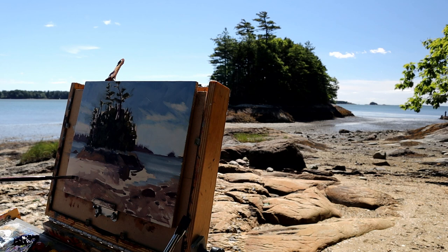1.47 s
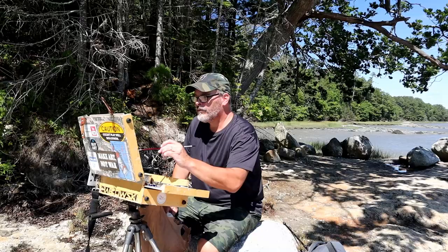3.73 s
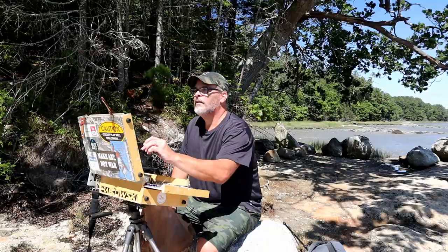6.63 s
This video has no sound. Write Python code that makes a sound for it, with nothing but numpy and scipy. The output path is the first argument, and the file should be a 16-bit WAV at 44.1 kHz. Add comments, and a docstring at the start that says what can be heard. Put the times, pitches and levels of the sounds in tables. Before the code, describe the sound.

Leaves hiss all around as uneven gusts thump against the microphone, with a faint distant bird and a few light wooden taps.

```python
"""Gusty breeze on a wooded shore

Tree crowns hiss all around; near leaves patter and flick, and wood taps lightly close by. A far bird
gives two short whistles. Air tumbles right over the microphone in dull buffets and pops, the hardest
ducking the recorder's limiter. Halfway through, the sound cuts abruptly: the tree hiss drops and the
wind stops leaning left."""
import sys
import numpy as np
from scipy import signal
from scipy.fft import rfft, irfft, next_fast_len
from scipy.io import wavfile
from scipy.ndimage import uniform_filter1d, minimum_filter1d, map_coordinates

SR = 44100
rng = np.random.default_rng(int(sys.argv[2]) if len(sys.argv) > 2 else 0)


def persist_wave(psi):
    """Save psi, clipped to +-1, as 16-bit WAV."""
    counts = np.round(np.clip(psi, -1, 1) * 32767).astype(np.int16)
    wavfile.write(sys.argv[1], SR, np.atleast_2d(counts).T)


N = 323253
TIME = np.arange(N) / SR
CUT_S = 3.85  # the sound cuts abruptly


def from_db(db):
    """Decibels to gain."""
    return 10 ** (np.asarray(db) / 20)


def unit_rms(x):
    """Scale to an rms of 1."""
    return x / np.sqrt(np.mean(x ** 2) + 1e-20)


def in_time(rows):
    """Each column of a curve at every sample."""
    times, *columns = np.transpose(rows)
    return [np.interp(TIME, times, column) for column in columns]


def at_hz(points, hz):
    """Read a table on a log-frequency axis."""
    table = np.array(points)
    return np.interp(np.log(hz + 1), np.log(table[:, 0]), table[:, 1])


def colour(x, spectrum):
    """Give a signal a spectrum that falls away beyond its ends; rms 1."""
    hz = np.fft.rfftfreq(x.shape[-1], 1 / SR)
    ends = np.minimum(hz / spectrum[0][0], 1) ** 2 / np.maximum(hz / spectrum[-1][0], 1) ** 4
    return unit_rms(irfft(rfft(x) * from_db(at_hz(spectrum, hz)) * ends, x.shape[-1]))


def drift(per_s):
    """A random wander with about this many changes a second; spread 1."""
    hop, settle = 40, 2000
    pole = np.exp(-2 * np.pi * hop * per_s / SR)
    noise = rng.standard_normal(N // hop + settle + 2)
    slow = signal.lfilter([1], [1, -2 * pole, pole * pole], noise)[settle:]
    return np.interp(np.arange(N) / hop, np.arange(len(slow)), unit_rms(slow))


# The microphone's two ports hear the trees alike in the bass, opposed in the treble:
# (frequency [Hz], correlation [-1 to 1])
PORT_LIKENESS = [(500, 1), (1200, 0.84), (2100, 0.65), (3100, 0.066), (4200, -0.34), (5800, -0.61),
                 (10000, -0.75)]
def all_around(pair):
    """Two unrelated signals become the left and right of a sound that surrounds the microphone."""
    size = next_fast_len(N)
    alike = np.clip(at_hz(PORT_LIKENESS, np.fft.rfftfreq(size, 1 / SR)), -.99, .99)
    mid, side = irfft(rfft(pair, size) * np.sqrt([1 + alike, 1 - alike]), size)
    return np.array([mid + side, mid - side])


def leaf_touches(per_s, spread_db):
    """Countless tiny contacts of uneven size, in two unrelated streams."""
    sizes = from_db(spread_db * np.minimum(rng.exponential(1, (2, N)), 4))
    return sizes * rng.standard_normal((2, N)) * (rng.random((2, N)) < per_s / SR)


# The trees before and after the cut: (time [s], crown level [dB], near-leaf level [dB])
TREES_BEFORE_CUT = [(0.0, -49.5, -59), (0.4, -47.5, -57), (2.6, -50, -58), (3.82, -48.5, -59.5)]
TREES_AFTER_CUT = [(3.88, -54, -60.5), (4.84, -49, -54), (5.79, -51, -57), (5.92, -49.5, -55),
                   (6.75, -47, -52.5), (7.33, -47, -53.5)]
# Hiss of the far crowns and sizzle of the near leaves: (frequency [Hz], level [dB])
CROWN_SPECTRUM = [(100, 15), (400, 5), (900, 3), (1400, 0.5), (2400, 2), (4200, 3), (6500, -0.5),
                  (10000, -8), (14000, -18)]
LEAF_SPECTRUM = [(2500, -19), (5000, -4), (8000, -1), (11500, 0.5), (13000, -5.5), (15000, -37)]
def trees(crown_gain_db, leaf_gain_db, flutter_db):
    """Far crowns blur into a smooth hiss; near leaves keep a fine, fluttering grain."""
    hiss_db, sizzle_db = np.where(TIME < CUT_S, in_time(TREES_BEFORE_CUT), in_time(TREES_AFTER_CUT))
    crowns = colour(all_around(rng.standard_normal((2, N))), CROWN_SPECTRUM)[:, :N]
    leaves = colour(all_around(leaf_touches(per_s=24000, spread_db=-3.0)), LEAF_SPECTRUM)[:, :N]
    sizzle_db += leaf_gain_db + flutter_db * drift(25)
    return crowns * from_db(hiss_db + crown_gain_db) + leaves * from_db(sizzle_db)


# A far bird's two notes, and a faint, low blip that falls:
# (time [s], duration [s], first pitch [Hz], last pitch [Hz], level [dB])
BIRD_NOTES = [(3.28, 0.084, 2750, 2590, -52.5), (3.38, 0.088, 1800, 1730, -46)]
LOW_BLIP = [(2.842, 0.0374, 638.4, 470.3, -40.5)]
def whistles(notes, gain_db, waver_hz):
    """Short gliding whistles, blurred by the moving air on their way to the microphone."""
    out, waver = 0, waver_hz * drift(102.7)
    for start, duration, first_hz, last_hz, db in notes:
        progress = np.clip((TIME - start) / duration, 0, 1)
        hz = first_hz + (last_hz - first_hz) * progress + waver
        envelope = from_db(db + gain_db) * np.sin(np.pi * progress)
        out = out + envelope * np.sin(2 * np.pi * np.cumsum(hz) / SR)
    return out


# Dry leaves flicking around the microphone: (time [s], level [dB], duration [s])
LEAF_FLICKS = [(2.35, -51, .26), (2.387, -42, 0.0068), (2.845, -41, 0.046), (2.936, -46, .02),
               (5.95, -50, 0.036)]
# Their bright crackle: (frequency [Hz], level [dB])
FLICK_SPECTRUM = [(4000, -14), (7000, -8), (11500, 3), (14000, -4)]
def leaf_flicks(gain_db):
    """Soft crackles of leaf on leaf that swell and fade."""
    envelope = 0
    for centre, db, duration in LEAF_FLICKS:
        distance = np.minimum(np.abs(2 * (TIME - centre) / duration), 10)
        envelope = envelope + from_db(db) * np.exp(-distance ** 2)
    crackle = colour(all_around(leaf_touches(per_s=1500, spread_db=3.5)), FLICK_SPECTRUM)[:, :N]
    return from_db(gain_db) * envelope * crackle


def burst(start, t60):
    """A short, dying spray of noise."""
    envelope = from_db(-60 * np.clip((TIME - start) / t60, 0, 2)) * (TIME >= start)
    return envelope * rng.standard_normal((2, N))


# Light taps on wood, close by: (time [s], level [dB], contact cutoff [Hz])
WOOD_TAPS = [(5.372, -29, 4507), (5.387, -30, 4513), (5.469, -25, 1102), (5.515, -31, 1000),
             (6.699, -26.5, 2803)]
# The ring of the wood: (frequency [Hz], level [dB], time to fall 60 dB [s])
WOOD_MODES = [(980, 10, 0.0088), (1641, 5.5, 0.012), (2878.5, 0, 0.011), (3209, 1.5, 0.016)]
def wood_taps(gain_db, grit):
    """Slightly gritty contacts ring the short modes of a piece of wood; soft ones miss the high modes."""
    contact, out = 0, 0
    for start, db, top_hz in WOOD_TAPS:
        touch = grit * burst(start, t60=0.01)
        touch[:, round(start * SR)] += 1
        softened = signal.lfilter(*signal.butter(2, top_hz, fs=SR), touch + 1e-18)
        contact = contact + from_db(db) * softened
    for hz, db, t60 in WOOD_MODES:
        pole, angle = np.exp(-np.log(1000) / (t60 * SR)), 2 * np.pi * hz / SR
        ring = signal.lfilter([0, np.sin(angle)], [1, -2 * pole * np.cos(angle), pole * pole], contact)
        out = out + from_db(db) * ring
    return from_db(gain_db) * out


def swells(rows, steepness, rise_share=.85, fall_share=1.1, rim_pitch_share=.7):
    """Air swells faster than it fades, duller at the rim: summed power, and power weighted by pitch."""
    out = np.zeros((2, N))
    for centre, db, duration, core_hz in rows:
        near = slice(*np.searchsorted(TIME, [centre - 2 * duration, centre + 2 * duration]))
        age = (TIME[near] - centre) / duration
        shape = np.exp(-np.abs(2 * age / np.where(age < 0, rise_share, fall_share)) ** steepness)
        power = from_db(db) ** 2 * shape
        hz = core_hz * (rim_pitch_share + (1 - rim_pitch_share) * shape)
        out[:, near] += power, power * hz
    return out


# Gusts and the strongest single eddies, right at the microphone:
# (time [s], level [dB], duration [s], core pitch [Hz])
MIC_GUSTS = [(0.2, -26.5, 0.083, 328.8), (0.56, -23, 0.27, 360), (0.98, -28.5, 0.3, 300.1),
             (1.36, -29.5, .16, 309.4), (1.86, -17.5, 0.18, 459.7), (2.1, -23.5, 0.065, 330),
             (2.665, -29, 0.22, 310), (3.48, -25, 0.15, 254.9), (4.0, -27.5, .22, 419.3),
             (4.57, -22, .24, 438.8), (5.09, -24, .24, 388.4), (5.41, -22, .17, 380.1),
             (5.74, -29, 0.2, 309.2), (6.2, -25, 0.35, 390.2), (6.58, -16.5, 0.077, 418.6),
             (7.02, -20, 0.36, 399.8), (7.3, -22, 0.099, 381.5)]
MIC_EDDIES = [(0.008, -18.5, 0.025, 413), (0.062, -21.5, .014, 399.5), (0.13, -16, 0.029, 382),
              (0.194, -18.5, 0.0059, 367), (0.22, -19, 0.021, 366), (0.347, -20.5, 0.029, 290),
              (0.374, -14, 0.0096, 430.2), (0.439, -18.5, 0.04, 399.5), (0.491, -20, 0.0082, 408.6),
              (0.521, -9.5, 0.01, 375), (0.554, -12, 0.031, 523), (0.624, -15.5, 0.013, 444),
              (0.689, -11.5, 0.0053, 384), (0.704, -15, 0.012, 543.7), (0.753, -11, 0.015, 331.4),
              (0.825, -21, 0.029, 301.4), (0.873, -10, 0.016, 421), (0.96, -15.5, .016, 347.7),
              (1.008, -15.5, 0.02, 330.6), (1.048, -11.5, 0.011, 399.5), (1.18, -11.5, 0.0064, 432.4),
              (1.235, -10.5, .011, 520.7), (1.294, -16.5, .014, 449), (1.441, -20, 0.0092, 419.2),
              (1.738, -18.5, 0.026, 401.2), (1.776, -10, 0.0088, 601.4), (1.838, -7, 0.02, 704),
              (1.863, -8, 0.0072, 482.8), (1.899, -8, .012, 450), (1.936, -4, 0.017, 601),
              (1.977, -7, .02, 640), (2.04, -16.5, 0.0215, 349.1), (2.067, -9.5, 0.01104, 500.1),
              (2.224, -27, 0.0081, 290.1), (2.271, -23.5, 0.0082, 398.7), (2.368, -26, 0.013, 401.6),
              (2.888, -28, 0.01, 260.2), (2.98, -29.5, 0.024, 260.3), (3.357, -24.5, 0.036, 349),
              (3.61, -17.5, 0.0092, 379.5), (3.877, -17.5, 0.055, 496), (4.012, -20, 0.0072, 342.4),
              (4.207, -22, 0.019, 330), (4.308, -15.5, 0.032, 420), (4.49, -15, 0.032, 582.3),
              (4.532, -14, .012, 541), (4.592, -16, 0.02534, 447), (4.677, -9, 0.0071, 474.8),
              (4.84, -14, 0.045, 427.9), (4.912, -21.5, .022, 329.6), (5.051, -8.5, 0.027, 619.5),
              (5.107, -13.5, 0.00876, 620), (5.248, -16, .012, 540.3), (5.296, -22, 0.019, 520.2),
              (5.327, -8.5, 0.0083, 801.7), (5.918, -23.5, 0.014, 388.9), (6.006, -16, 0.036, 499.4),
              (6.128, -18, 0.024, 470.8), (6.169, -14, .012, 490.4), (6.226, -17, 0.013, 520.6),
              (6.3, -13, 0.03, 418), (6.342, -20.5, 0.018, 500.6), (6.415, -22, .04, 398.7),
              (6.492, -18, 0.027, 478.6), (6.54, -12, 0.0081, 478), (6.728, -16.5, 0.047, 395.3),
              (6.837, -10.5, 0.021, 449), (6.968, -18, .02, 449.4), (7.058, -11.5, 0.0068, 449),
              (7.113, -13.5, 0.024, 458.5)]
def airflow(lumpy_db, lumps_per_s, db_per_octave, calm_db=-40.5, calm_hz=244.66):
    """Power and mean pitch of the air at the microphone: a lumpy, gusting breeze plus single eddies."""
    calm = from_db(calm_db) ** 2 * np.array([[1], [calm_hz]])
    breeze = calm + swells(MIC_GUSTS, steepness=2.4)
    lump_db = lumpy_db * (np.tanh(drift(lumps_per_s)) - .25)
    lumpy = breeze * from_db(lump_db) ** 2
    lumpy[1] *= 2 ** (lump_db / db_per_octave)  # faster air is both louder and brighter
    power, weighted_hz = lumpy + swells(MIC_EDDIES, steepness=2.8)
    return power, weighted_hz / power


# Turbulent pressure on the microphone at a mean pitch of pattern_hz: (frequency [Hz], level [dB])
TURBULENCE_SPECTRUM = [(20, -59), (45, -11.5), (90, -10.5), (170, -1), (330, 1.5), (460, 0), (620, -4.5),
                       (820, -11), (1100, -18.5), (1600, -32.5), (2600, -60)]
def buffets(gain_db, evenness, ripple_db, ripples_per_s, db_per_octave, pattern_hz=420.7):
    """A frozen pattern of turbulence is swept past the microphone at the speed of the air."""
    power, pitch_hz = airflow(lumpy_db=6.0, lumps_per_s=42, db_per_octave=34)
    # each eddy breaks into smaller ones: brief crests that are louder and brighter
    crest_db = ripple_db * np.tanh(drift(ripples_per_s))
    pattern = colour(rng.standard_normal(next_fast_len(2 * N)), TURBULENCE_SPECTRUM)
    travelled = np.cumsum(pitch_hz / pattern_hz * 2 ** (crest_db / db_per_octave))
    pressure = from_db(crest_db) * map_coordinates(pattern, [travelled], order=3, mode="wrap")
    # the pattern gives the fine shape, the airflow gives the strength
    local_power = uniform_filter1d(pressure ** 2, size=520) + 1e-9
    return from_db(gain_db) * np.sqrt(power) * unit_rms(pressure / local_power ** (evenness / 2))


# Tight vortices that cross the ports in one swing of pressure: (time [s], level [dB], pitch [Hz])
VORTEX_POPS = [(0.1295, -3, 350), (0.372, -6, 866), (0.536, -8, 1206), (0.7036, 9, 741.3),
               (0.7365, 6.5, 467), (1.046, -8.5, 610), (1.102, -1, 554), (1.236, -7, 598.6),
               (1.2913, -10, 581.5), (1.3243, -3, 516.4), (1.651, -12, 420), (1.829, -1.5, 1354),
               (1.8611, -2.5, 1143), (1.9308, 7, 660.3), (1.94, 4.5, 1100), (1.968, 2, 798.5),
               (2.2513, -17, 320.7), (2.5984, -11, 550), (2.684, -14, 330.6), (2.712, -14, 259.5),
               (2.767, -16, 250), (3.4311, -9, 252), (3.462, -18, 318), (4.438, -6.5, 399.6),
               (4.5591, -3.5, 685.6), (5.0429, -1.5, 473.3), (5.0739, -1, 707), (5.108, -1, 307.3),
               (5.2472, -6.5, 475.2), (5.33, 2.5, 949.5), (5.427, -6.5, 329), (5.9633, -10, 307.5),
               (6.1594, -4, 578), (6.218, -2.5, 461.8), (6.538, -5, 1001), (6.9254, -2.5, 344.5),
               (6.9962, -3, 381), (7.007, -1.5, 421.8), (7.0785, -3.5, 424), (7.1209, 2.5, 501.4)]
def pops(gain_db, half_width_cycles=0.44, roundness=1.32):
    """A tight vortex sucks, then pushes; the smaller it is, the higher it sounds."""
    out = np.zeros(N)
    for centre, db, hz in VORTEX_POPS:
        near = slice(*np.searchsorted(TIME, [centre - 2 / hz, centre + 2 / hz]))
        cycles = (TIME[near] - centre) * hz
        envelope = np.exp(-np.abs(cycles / half_width_cycles) ** roundness)
        out[near] += from_db(db + gain_db) * envelope * np.sin(2 * np.pi * cycles)
    return out


# Direction of the air across the microphone: (time [s], lead at the left port [s])
LEFT_PORT_LEAD = [(2.0, .00016), (2.3, .00001), (5.4, -.00002), (5.9, .00005)]
def wind_at_ports(pressure, band_hz, shared_hz, veer_s=.00008, veers_per_s=20, lean_db=1.1):
    """The ports pass a band of the veering wind; big eddies cover both, small ones reach them in turn."""
    mid = signal.sosfilt(signal.butter(2, band_hz, "band", fs=SR, output="sos"), pressure)
    lead_s = in_time(LEFT_PORT_LEAD)[0] + veer_s * drift(veers_per_s)
    lag = lead_s / 2 * np.gradient(mid) * SR  # adding the slope acts as a tiny time shift
    lean = (from_db(lean_db * (TIME < CUT_S)) - 1) / 2 * mid  # louder on the left until the cut
    side = signal.sosfiltfilt(signal.butter(1, shared_hz, "high", fs=SR, output="sos"), lag + lean)
    return np.array([mid + side, mid - side])


def scene():
    """The shore from the microphone: buffets up close in the middle, the trees all around."""
    pressure = buffets(gain_db=-2.0, evenness=0.88, ripple_db=4.0, ripples_per_s=151.0, db_per_octave=28)
    pressure += pops(gain_db=-1.5)
    wind = wind_at_ports(pressure, band_hz=(52.5, 2480), shared_hz=480)
    foliage = trees(crown_gain_db=10.5, leaf_gain_db=13.0, flutter_db=0.7) + leaf_flicks(gain_db=4.0)
    bird = whistles(BIRD_NOTES, gain_db=5.5, waver_hz=45.28)
    blip = whistles(LOW_BLIP, gain_db=2.5, waver_hz=15.0)
    return foliage + bird + blip + wood_taps(gain_db=1, grit=0.057) + wind


def limiter(x, limit_db, recovery_s):
    """The gain drops just ahead of a peak that would pass the limit, then comes back, quickly at first."""
    peak_db = 20 * np.log10(np.abs(x).max(axis=0) + 1e-9)
    over_db = np.maximum(peak_db - limit_db, 0)
    release = np.exp(-TIME / recovery_s)
    duck_db = np.maximum.accumulate(over_db / release) * release
    look_ahead_db = minimum_filter1d(-duck_db, size=90)
    return x * from_db(uniform_filter1d(look_ahead_db, size=90))


def record(dry):
    """The hardest pop overloads the input with a thin snap; hard buffets duck it all; the top is cut."""
    overload, cutoff_hz = from_db(4.6), 14300
    limited = limiter(np.clip(dry, -overload, overload), limit_db=-0.6, recovery_s=0.23)
    return signal.sosfilt(signal.ellip(10, .1, 80, cutoff_hz, fs=SR, output="sos"), limited)


dry = scene()
out = record(dry)
persist_wave(out)
```